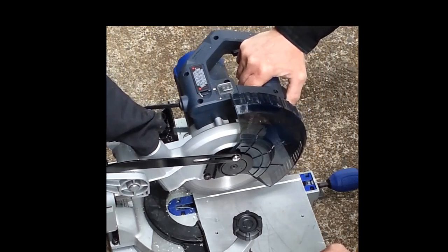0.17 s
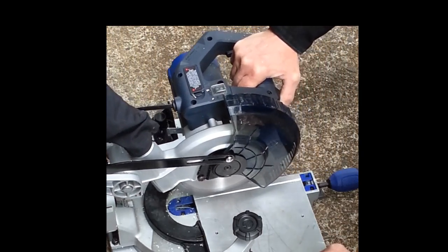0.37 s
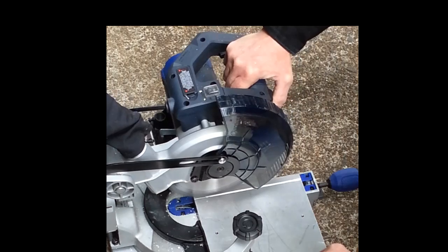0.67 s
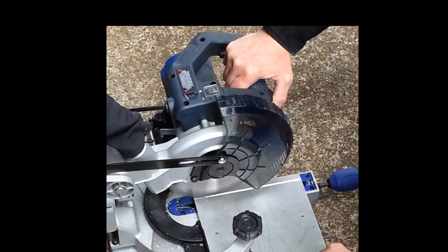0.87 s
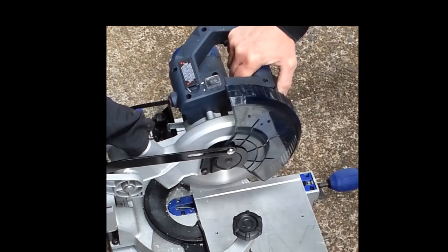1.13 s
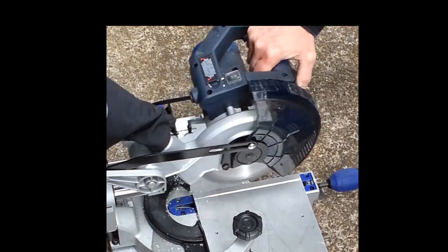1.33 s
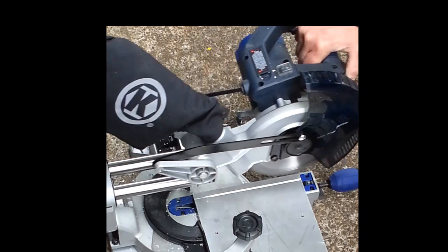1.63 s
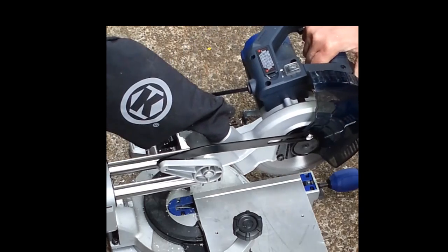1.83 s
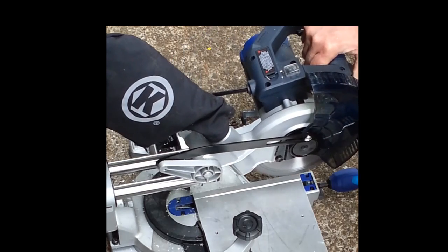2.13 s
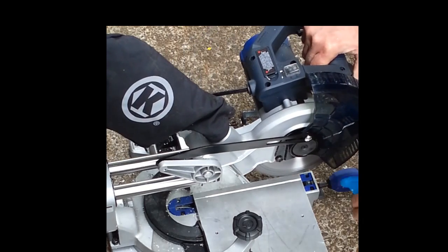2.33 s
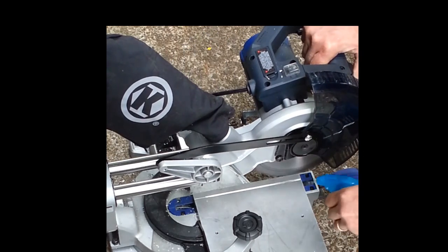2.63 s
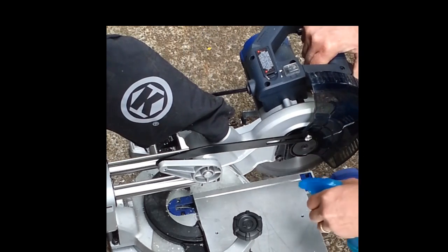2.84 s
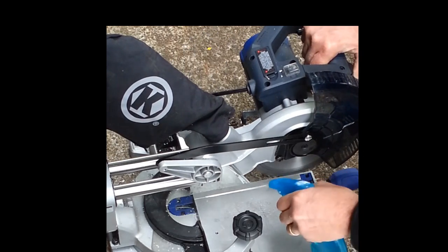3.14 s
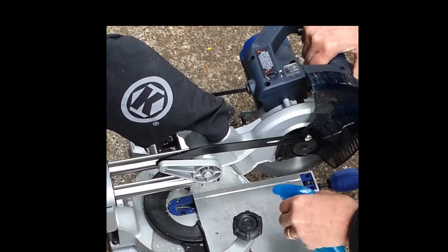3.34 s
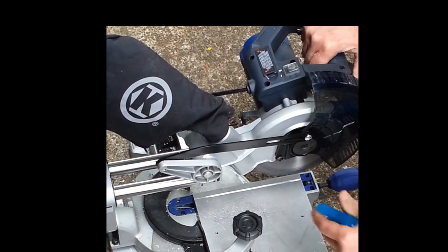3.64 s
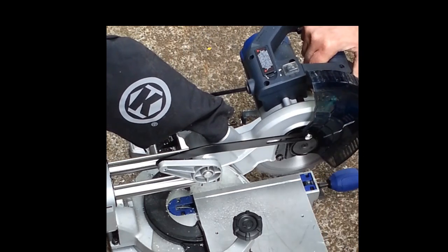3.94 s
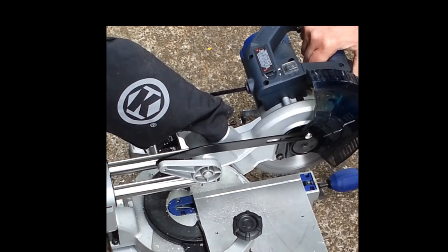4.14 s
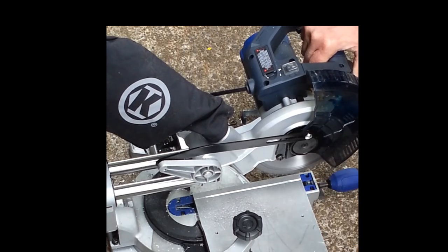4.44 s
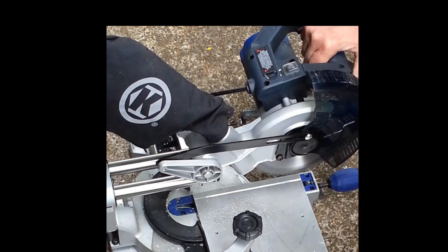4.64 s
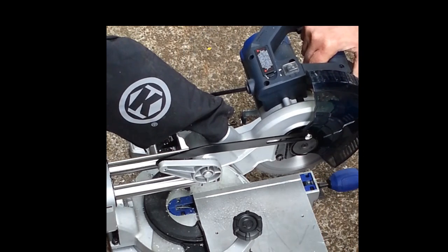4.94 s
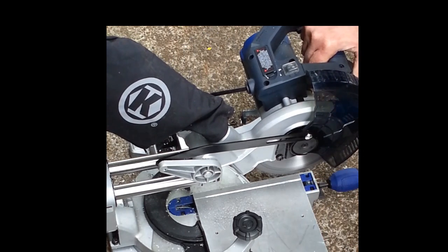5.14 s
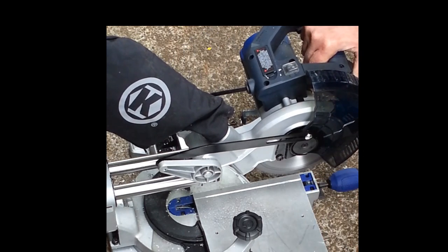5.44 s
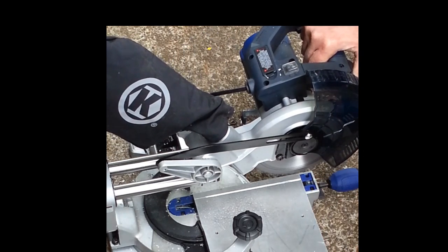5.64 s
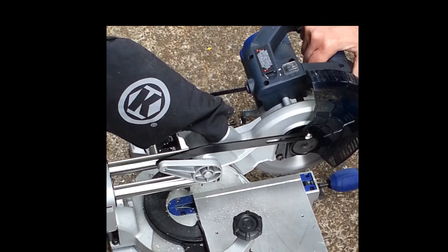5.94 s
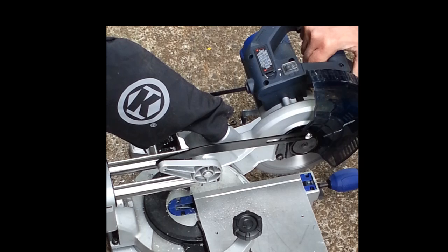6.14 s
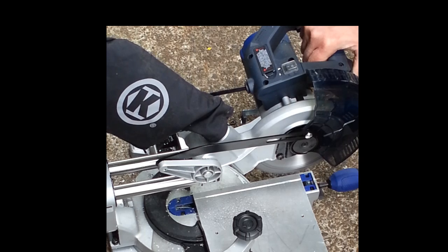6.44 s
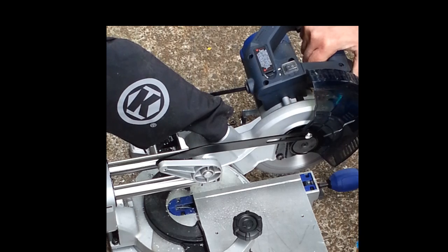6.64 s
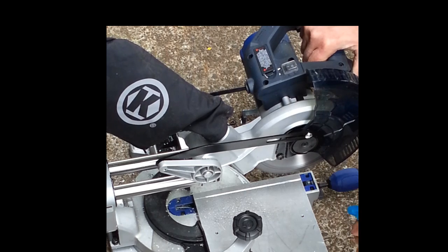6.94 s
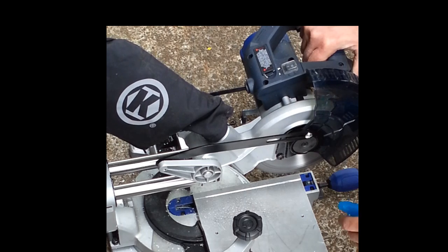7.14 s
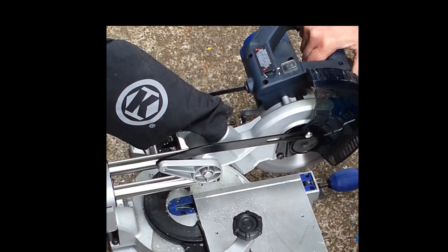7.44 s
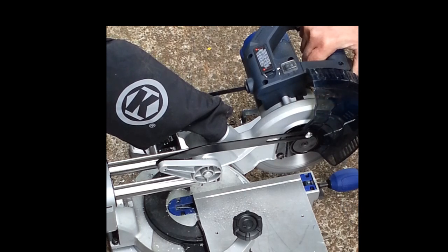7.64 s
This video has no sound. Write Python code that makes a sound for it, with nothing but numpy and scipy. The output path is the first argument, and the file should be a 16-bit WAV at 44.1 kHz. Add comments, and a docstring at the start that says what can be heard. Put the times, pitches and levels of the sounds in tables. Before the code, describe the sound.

Harsh metallic tearing and ringing of a power saw in metal plate give way to a hollow roar, then a slightly higher free-running motor whine.

```python
"""A sliding miter saw finishes a cut in aluminium plate outdoors, close to the microphone, then runs free.
First the teeth tear off chips (shaped noise), blade and plate ring and squeal, and the load holds the motor
down. Then the last sliver parts and the blade slides out: ringing and tearing fade to a faint brush, the kerf
(the slot) roars and the motor climbs. Fan tone, gear whine, bearings (sines) and rushing air (noise) sound
throughout and are left nearly bare at the end. The microphone overloads, which flattens the peaks."""
import sys
import numpy as np
from scipy import signal
from scipy.fft import rfft, irfft
from scipy.io import wavfile
from scipy.ndimage import uniform_filter1d

SR = 44100
rng = np.random.default_rng(int(sys.argv[2]) if len(sys.argv) > 2 else 0)


def transcribe(signal):
    """Save signal, clipped to [-1, 1], as a 16-bit WAV file at the path in sys.argv[1]."""
    frames = np.atleast_2d(signal).T
    limited = np.clip(frames, -1, 1)
    pcm = np.round(limited * 32767).astype(np.int16)
    wavfile.write(sys.argv[1], SR, pcm)


N = 343980
TIME = np.arange(N) / SR
BINS = np.fft.rfftfreq(N, 1 / SR)  # Hz
PINION_TEETH, GEAR_TEETH, BLADE_TEETH = 7, 36, 54
PATCHY_DB = 1.6  # depth of the flicker in the tearing and in the rush of air


# Tone colour of the tearing chips: pitch_hz, relative_level_db
CHIP_COLOUR = [(30, -29), (250, -16), (450, -6.5), (700, -1.5), (1050, -3.5), (1700, -5.5), (2400, -2.5),
               (4000, -3.5), (5600, -5), (7000, -8.5), (8500, -5), (9700, -10), (14500, -15.5),
               (15100, -36)]
# Ringing of blade and plate: pitch_hz, width_hz, relative level deep_in_cut_db, relative level end_of_cut_db
BLADE_MODES = [(750, 14, -27, -25), (1178, 12, -30, -30), (1218, 12, -29, -29), (1255, 9, -32, -32),
               (1418, 8, -30, -30), (1463, 8, -32, -31), (1544, 8, -27, -31), (1920, 8, -28, -32),
               (1950, 7, -31, -35), (2270, 14, -29, -29), (2432, 14, -28, -27), (2647, 8, -29, -27),
               (2805, 9, -30, -29), (3005, 12, -30, -29), (3248, 12, -26, -24.5), (3317, 6, -28, -29),
               (3412, 18, -24.5, -28), (3562, 16, -25, -26), (3970, 50, -29, -30), (4388, 8, -27, -28),
               (4438, 10, -27, -27), (4660, 45, -24, -27), (4770, 10, -30, -29), (5015, 12, -29, -30),
               (5480, 50, -33, -32), (6370, 35, -32, -33), (6566, 10, -30, -26), (6965, 30, -34, -31),
               (7590, 30, -33, -32), (7850, 20, -32, -32), (7957, 18, -28, -27), (9020, 22, -31, -38),
               (10595, 12, -34, -33), (10750, 220, -28, -31), (12050, 250, -32, -35), (12780, 25, -44, -40),
               (13450, 350, -34, -34), (14170, 30, -40, -37), (14500, 280, -33, -33)]
DEEP_S, SHALLOW_S = 0.35, 0.81  # the ring moves from deep-cut to end-of-cut levels between these times
BRUSH_RING = 0.14  # share of the ringing that stays while the teeth only brush the kerf


def cut(blade_turns):
    """Each tooth tears off a chip; the uneven bite keeps blade and plate ringing, on other modes as the cut ends."""
    teeth = 1 + 0.5 * np.cos(2 * np.pi * BLADE_TEETH * blade_turns)
    runout = 1 + 0.085 * np.cos(2 * np.pi * blade_turns)  # the blade runs slightly untrue
    chatter = gain_of(0.8 * drift(25))

    chips = rfft(turbulence(1.0) * teeth)
    chips = chips * gain_of(across(CHIP_COLOUR)) * reflections(strength_db=-7.5)
    tearing = patchy(irfft(chips, N), PATCHY_DB)

    modes = np.array(BLADE_MODES)
    deep_ring = ringing(modes[:, [0, 1, 2]])
    shallow_ring = ringing(modes[:, [0, 1, 3]])
    progress = np.clip(ramp(DEEP_S, SHALLOW_S), 0.13, 1)  # some end-of-cut ring from the start
    ring = np.sqrt(1 - progress) * deep_ring + np.sqrt(progress) * shallow_ring

    held_ring = gain_of(0.4) * np.maximum(contact(), BRUSH_RING) * ring
    return runout * chatter * (gain_of(-10) * bite() * tearing + held_ring)


# Squeals of the rubbing blade, and one flare of the gear whine at 1.68 s:
# middle_s, half_length_s, pitch_hz, level_db, left_right_db
SQUEALS = [(.03, .09, 3317, -25, -1), (.11, .08, 1418, -25, 3), (.16, .05, 7957, -25, 3),
           (.38, .45, 4388, -22.5, -3), (.12, .12, 4610, -23.5, 0), (.47, .2, 4635, -23, 0),
           (.51, .09, 3562, -24, 2), (.53, .1, 6945, -27, 5), (.62, .42, 3317, -24, 1),
           (.66, .06, 1418, -26, 4), (.8, .13, 6566, -20, 4), (.79, .1, 6990, -26, 4),
           (.93, .3, 1935, -21.5, 2), (.9, .1, 7957, -22.5, 3), (.93, .2, 12780, -34, 0),
           (.95, .08, 1418, -22, 5), (.97, .1, 2647, -26, 4), (1.15, .06, 6575, -25, 4),
           (1.52, .07, 746, -23, 0), (1.62, .05, 4010, -26, -2), (1.67, .07, 746, -22, 0),
           (1.68, .08, 6070, -25, -1), (1.92, .09, 4005, -20, -3), (2.17, .06, 2375, -23, 0)]


def squeals():
    """Squeals of the rubbing blade, some brief and some held through much of the cut, and one gear whine flare."""
    total = 0
    for middle, half, hz, db, tilt in SQUEALS:
        squeal = tone(hz * TIME, flutter=0.25, flutter_hz=25, tilt_db=tilt, lead=-hz / 5000)
        total = total + gain_of(db) * swell(middle, half, half) * squeal
    return total


# Ringing of the blade against the kerf wall on its way out: pitch_hz, width_hz, relative_level_db
GRAZE_MODES = [(682, 12, -24), (746, 5.4, -24.5), (1720, 35, -38), (2460, 280, -18.5), (3170, 150, -20.5),
               (3860, 50, -18), (4400, 40, -33)]
EXIT_HUM_DB = -25.5  # level at the top of the exit swell


def grazes(blade_turns):
    """As the blade slides out it rings roughly on the kerf wall, and a low bearing tone grows to a hum."""
    hum = gain_of(EXIT_HUM_DB) * tone(6.15 * blade_turns, flutter=0.2, flutter_hz=9, tilt_db=0)
    return sliding_out() * (hum + ringing(GRAZE_MODES))


# Brief swells and dips of the fan tone: middle_s, half_length_s, gain_db
FAN_SWELLS = [(.87, .12, -3), (1.148, 0.11, 2.2), (1.63, .12, -1), (2.97, 0.11, -2), (4.45, 0.34, 2)]
# Hum at the motor speed, which emerges as the load lets go: time_s, level_db
SHAFT_HUM = [(0, -37.5), (1.3, -37), (1.55, -31), (1.85, -25), (2.02, -32), (2.7, -29), (5.7, -27.5),
             (7.8, -27.5)]
# Armature whine before load and flares: multiple_of_motor_speed, level_db, left_right_db
MOTOR_WHINE = [(9, -32, -6), (10, -24.5, -30), (11, -28.5, -24), (12, -29, -12), (18, -43, 2)]
# Resonances of the motor housing: pitch_hz, width_hz, lift_db
HOUSING = [(5075, 25, 4.5), (5150, 85, 11.5), (5273, 22, 7.5)]
# Fan tone: level running free, gain under load, change as the blade exits, slow wander
FAN_DB, FAN_LOAD_DB, FAN_EXIT_DB, FAN_WANDER_DB = -20, 1.5, -1, 1.27


def motor(turns):
    """Fan tone, shaft hum, and armature whine that flares where it climbs through a housing resonance."""
    fan_db = FAN_DB + FAN_LOAD_DB * load() + FAN_EXIT_DB * sliding_out() + FAN_WANDER_DB * drift(1.4)
    for middle, half, db in FAN_SWELLS:
        fan_db = fan_db + db * swell(middle, half, half)
    # the fan sings at twice the motor speed
    fan = gain_of(fan_db) * tone(2 * turns, flutter=0.16, flutter_hz=30, tilt_db=-1.5, lead=0.4)

    hum_db = np.interp(TIME, *np.transpose(SHAFT_HUM))
    hum = gain_of(hum_db) * tone(turns, flutter=0.23, flutter_hz=18, tilt_db=-2.0)

    whine = 0
    for multiple, db, tilt in MOTOR_WHINE:
        flare_db = 0
        for hz, width, lift in HOUSING:
            flare_db = flare_db + lift / (1 + ((multiple * speed() - hz) / width) ** 4)
        flutter = 0.25 + 0.03 * multiple  # higher tones are rougher
        voice = tone(multiple * turns, flutter, flutter_hz=9.3, tilt_db=tilt)
        whine = whine + gain_of(db + flare_db) * voice
    return fan + hum + whine * np.clip(1 - 0.87 * bite(), 0.1, 1)


# Blade wobble, then gear mesh and overtones with once-a-turn sidebands, before load and swell:
# multiple_of_blade_speed, level_db
GEAR_TONES = [(4, -39), (10, -33), (34, -32), (35, -31.5), (37, -33), (38, -35), (39, -37), (70, -43),
              (71, -35), (72, -29.5), (73, -26), (74, -27), (75, -43), (109, -44), (144, -49), (145, -38),
              (146, -41)]
WHINE_LOAD_DB = -9  # change of the gear sound under load
WHINE_SWELL_DB, WHINE_CREST_S, WHINE_PERIOD_S = 1.5, 3.3, 4  # slow swell: depth, time of a crest, period


def gears(blade_turns):
    """The slightly eccentric gear sings at its mesh rate and sidebands, most clearly without load."""
    mesh = 0
    for multiple, db in GEAR_TONES:
        voice = tone(multiple * blade_turns, flutter=0.29, flutter_hz=8.6, tilt_db=-5.5, lead=-1.45)
        mesh = mesh + gain_of(db) * voice
    hum = tone(2 * blade_turns, flutter=0.3, flutter_hz=8, tilt_db=15)
    swell_db = WHINE_SWELL_DB * np.cos(2 * np.pi * (TIME - WHINE_CREST_S) / WHINE_PERIOD_S)
    return (gain_of(swell_db) * mesh + gain_of(-39.5) * hum) * gain_of(WHINE_LOAD_DB * load())


# Bearing tones before the gains below: multiple_of_blade_speed, level_db,
# slip_turns_per_s (wander of the blade speed as the balls slip)
BEARING_TONES = [(5.41, -40, .1), (6.15, -39, .1), (7.27, -35, .3), (7.77, -36, .3), (8.78, -37, .3),
                 (9.47, -35, .3), (23.1, -32.5, .5), (27.55, -29.5, .5), (42.83, -28.5, .06),
                 (44.7, -32, .4), (46.3, -26, .35), (47.1, -26.5, .35), (48.4, -23.5, .4)]
BEARING_DB, BEARING_LOAD_DB = -2.5, -3.5  # gain running free, further change under load


def bearings(blade_turns):
    """The bearings sing between the shaft's multiples; slipping balls make the tones waver and cross."""
    song = 0
    for multiple, db, slip in BEARING_TONES:
        slipping_turns = blade_turns + np.cumsum(slip * drift(7)) / SR
        voice = tone(multiple * slipping_turns, flutter=0.45, flutter_hz=9, tilt_db=-1.5, lead=-multiple / 48)
        song = song + gain_of(db) * voice
    return gain_of(BEARING_DB + BEARING_LOAD_DB * load()) * song


# Tone colour of the rushing air: pitch_hz, relative_level_db
AIR_COLOUR = [(30, -27), (100, -16), (280, -15), (420, -12), (620, -4), (950, -2.5), (1350, -3),
              (1800, 1.5), (2800, -1), (4500, 1), (5600, -5), (9300, -7.5), (9700, -12), (13600, -18.5),
              (15000, -21.5)]
# Hollows of guard and motor housing blown by the air: pitch_hz, width_hz, relative_level_db
HOLLOWS = [(119.8, 5, -42.5), (177, 9, -41.5), (490, 17, -33), (626.6, 29, -26.5), (738, 23, -29.5),
           (815.4, 15, -24.5), (839, 12, -32), (923, 20, -26.5), (1012, 21, -30), (1207, 31, -30),
           (1446, 35, -31.5), (1630, 26, -29), (1880, 150, -25.5), (2098, 25, -25.5), (2347, 32, -25),
           (2498, 30, -27), (3090, 64, -26.5), (3820, 60, -37), (4200, 150, -24.5), (4730, 150, -27.5),
           (6400, 350, -22), (12000, 440, -33)]
# Air squeezed through the kerf: level in the cut, level at the top of the exit swell
KERF_CUT_DB, KERF_EXIT_DB = -29, -18


def air():
    """Wind from blade and fan rushes, blows the hollows, and swells in the open kerf."""
    gusts = gain_of(0.3 * drift(12))
    wind = turbulence(gain_of(across(AIR_COLOUR)) * reflections())
    rush = gain_of(-8.0) * patchy(wind, PATCHY_DB) + ringing(HOLLOWS)
    weaker_in_cut = np.sqrt(np.clip(1 - 0.75 * bite() ** 2, 0, 1))

    squeeze = np.hypot(gain_of(KERF_CUT_DB) * load(), gain_of(KERF_EXIT_DB) * sliding_out())
    # kerf resonances: pitch_hz, width_hz, relative_level_db
    kerf = squeeze * ringing([(585, 22, -8), (644, 12, -11.0), (823, 18, -11.0), (870, 120, -1.5)])
    return rush * gusts * weaker_in_cut + kerf


def reflections(strength_db=-12, count=14):
    """Table, fence and paving send back short echoes that ripple the spectrum at each port."""
    echoes = np.zeros((2, N))
    for port in echoes:
        delays_s = rng.uniform(0.003, 0.03, count)
        port[(SR * delays_s).astype(int)] = rng.choice([-1, 1], count)
    return 1 + gain_of(strength_db) * rfft(echoes) / np.sqrt(count)


LEAVING_S, CLEAR_S = 0.87, 2.36  # the teeth run out of the plate between these times


def load():
    """1 while the teeth are in the plate, falling to 0 once they are clear."""
    return 1 - ramp(LEAVING_S, CLEAR_S)


BRUSH_TEARING = 0.42  # share of the bite that stays while the teeth only brush the kerf


def bite():
    """How hard the teeth bite: fully under load, a lighter brush afterwards."""
    return BRUSH_TEARING + (1 - BRUSH_TEARING) * load()


THINNING_S, THROUGH_S = 1.1, 1.5  # the last sliver thins and parts between these times


def contact():
    """1 while the plate holds the blade, falling to 0 once the last sliver is through."""
    return 1 - ramp(THINNING_S, THROUGH_S)


EXIT_S, EXIT_RISE_S, EXIT_FALL_S = 1.43, 0.24, 0.53  # top of the swell, quick rise, slower fall


def sliding_out():
    """The swell of the blade's way out through the open kerf."""
    return swell(EXIT_S, EXIT_RISE_S, EXIT_FALL_S)


LOADED_HZ, FREE_HZ = 418, 443.5  # motor turns per second in the cut and running free
RELEASE_S, SPIN_UP_S = 1.14, 0.55  # when the load lets go, time constant of the climb


def speed():
    """Motor turns per second: held down by the cut, then settling towards free speed."""
    since_release = np.maximum(TIME - RELEASE_S, 0)
    return FREE_HZ - (FREE_HZ - LOADED_HZ) * np.exp(-since_release / SPIN_UP_S)


def ramp(start_s, end_s):
    """Goes from 0 to 1 between two times."""
    return np.clip((TIME - start_s) / (end_s - start_s), 0, 1)


def swell(top_s, rise_s, fall_s):
    """A bell of height 1 with its own rise and fall."""
    return np.exp(-((TIME - top_s) / np.where(TIME < top_s, rise_s, fall_s)) ** 2)


def gain_of(db):
    """Decibels to amplitude."""
    return 10 ** (np.asarray(db) / 20)


def evened(x):
    """Scales to rms 1 (average strength 1)."""
    return x / np.sqrt(np.mean(abs(x) ** 2) + 1e-20)


def across(rows):
    """Joins (pitch_hz, value) rows on a log-frequency axis."""
    hz, value = np.transpose(rows)
    return np.interp(np.log(BINS + 1), np.log(hz + 1), value)


def drift(rate_hz):
    """Slow random motion of rms 1, drawn at a low rate."""
    times = np.linspace(0, N / SR, 4096)
    hz = np.fft.rfftfreq(len(times), times[1])
    smooth = irfft(rfft(rng.standard_normal(len(times))) / (1 + (hz / rate_hz) ** 4))
    return evened(np.interp(TIME, times, smooth))


def placed(tilt_db):
    """Left and right gains of mean power 1; a positive tilt makes the left louder."""
    pair = np.array([gain_of(tilt_db / 2), gain_of(-tilt_db / 2)]).reshape(2, -1)
    return pair / np.sqrt(np.mean(pair ** 2, 0))


def tone(turns, flutter, flutter_hz, tilt_db, lead=0.0):
    """A sine whose strength and phase flutter; the left leads by some radians."""
    wobble = evened(1 + flutter * (drift(flutter_hz) + 1j * drift(flutter_hz)))
    wave = np.exp(2j * np.pi * (turns + rng.random())) * wobble
    return np.sqrt(2) * np.array([wave, wave * np.exp(-1j * lead)]).real * placed(tilt_db)


# How alike left and right noise are: pitch_hz, likeness (0 to 1)
LIKENESS = [(30, .05), (230, 0.052), (430, 0.91), (880, 0.67), (1250, 0.31), (2000, 0.33), (2900, 0.64),
            (4200, 0.28), (9000, 0.22)]
# How far the left leads the right: pitch_hz, lead_radians
LEFT_LEAD = [(400, 0), (900, 0.5), (1400, -1.4), (2500, -1.5), (4000, -2), (8000, -3.5)]
# Left against right: pitch_hz, left_right_db
STEREO_TILT = [(40, -8), (170, 14.5), (280, 5), (450, 0), (900, -0.5), (1200, 5), (2000, 0.5), (9000, 0.5),
               (10500, -2.5), (14000, -7)]


def turbulence(colour):
    """Coloured noise as the two microphone ports pick it up, scaled to rms 1."""
    left, other = rfft(rng.standard_normal((2, N)))
    same = np.clip(across(LIKENESS), 0, 1)
    right = (same * left + np.sqrt(1 - same ** 2) * other) * np.exp(-1j * across(LEFT_LEAD))
    return evened(irfft(np.array([left, right]) * colour * placed(across(STEREO_TILT)), N))


def ringing(modes):
    """Resonances kept sounding by a random drive, each at its own level."""
    power = 0
    for hz, width, db in modes:
        power = power + gain_of(db) ** 2 / width / (1 + ((BINS - hz) / width) ** 2) ** 2
    total_gain = np.linalg.norm(gain_of([db for _, _, db in modes]))
    return total_gain * turbulence(np.sqrt(power))


def patchy(x, depth_db):
    """Bands of the noise flicker independently, in patches of some 700 Hz by 50 ms."""
    spectrum = signal.stft(x, nperseg=512)[2]
    field = rng.standard_normal(spectrum.shape[1:])
    field = uniform_filter1d(field, size=8, axis=0)  # smooth over pitch
    field = uniform_filter1d(field, size=9, axis=1)  # smooth over time
    flickering = spectrum * gain_of(depth_db * evened(field))
    return evened(signal.istft(flickering)[1][:, :N])


def scene():
    """One shaft speed drives motor, gears, bearings and blade."""
    turns = np.cumsum(speed() + 0.15 * drift(4.9)) / SR
    blade_turns = turns * PINION_TEETH / GEAR_TEETH
    blade = cut(blade_turns) + squeals() + grazes(blade_turns)
    machine = motor(turns) + gears(blade_turns) + bearings(blade_turns) + air()
    return blade + machine


EDGE_HZ = 15750  # upper edge of the sound


def record(dry):
    """The overloaded input flattens the peaks; then a low-pass filter limits the band."""
    hot = dry * gain_of(1.0) * placed(-0.88)
    clipped = hot / (1 + (hot / 0.93) ** 12) ** (1 / 12)
    low_pass = signal.firwin(511, EDGE_HZ, window=("kaiser", 8), fs=SR)
    return signal.oaconvolve(clipped, low_pass[None], "same")


dry = scene()
out = record(dry)
transcribe(out)
```